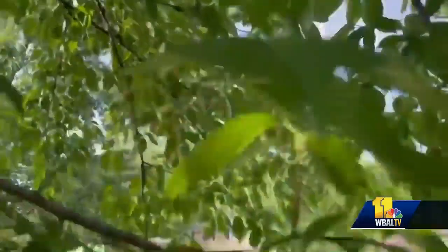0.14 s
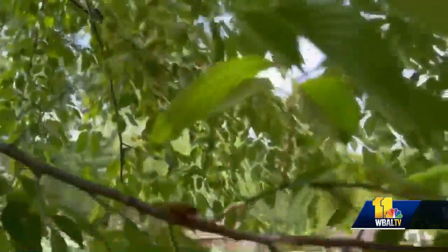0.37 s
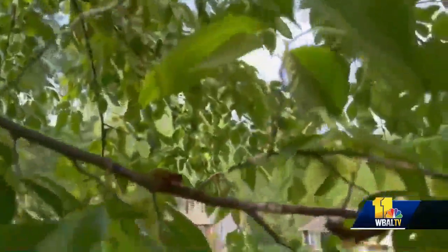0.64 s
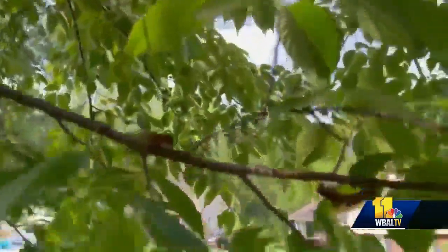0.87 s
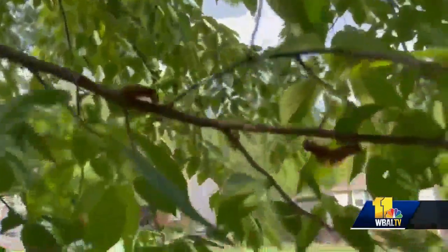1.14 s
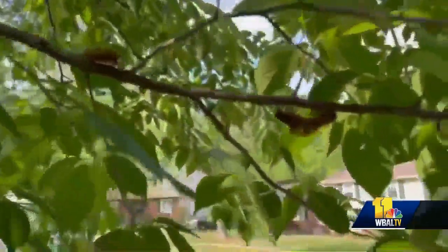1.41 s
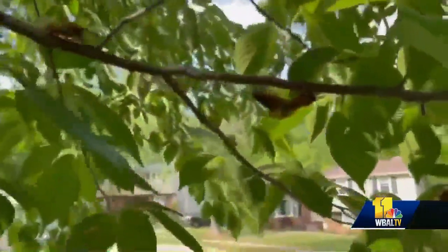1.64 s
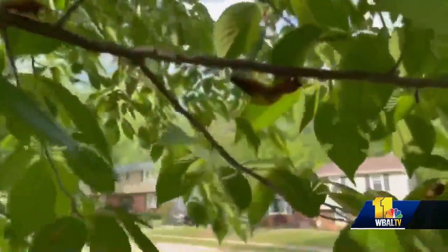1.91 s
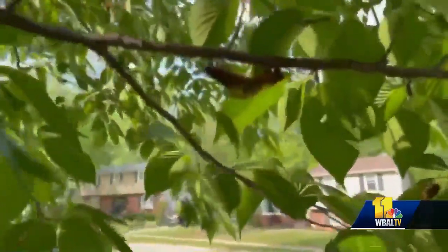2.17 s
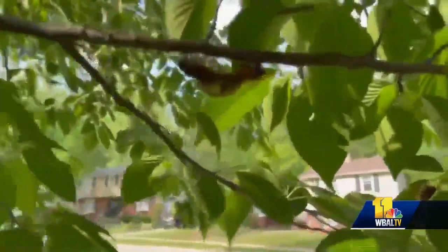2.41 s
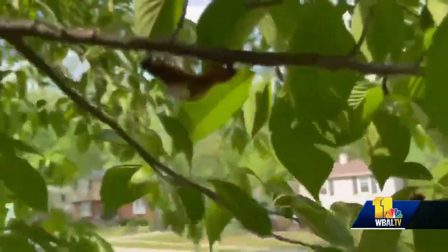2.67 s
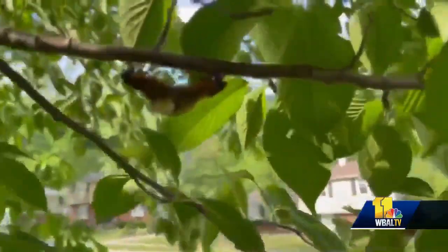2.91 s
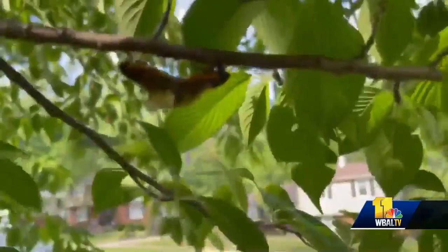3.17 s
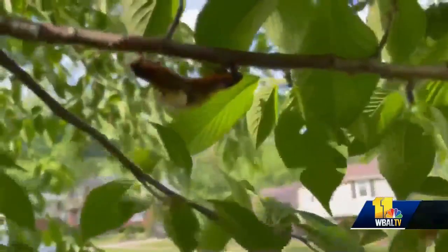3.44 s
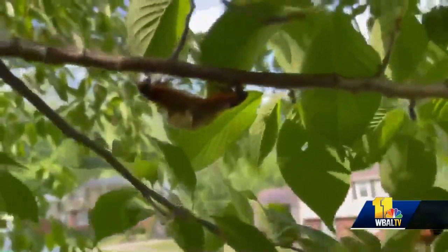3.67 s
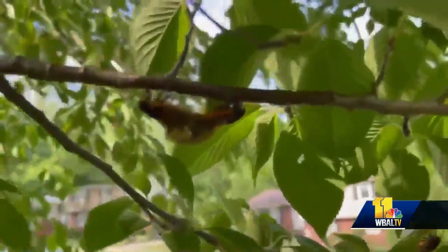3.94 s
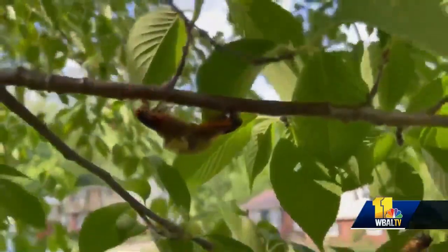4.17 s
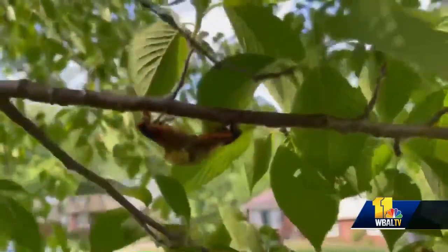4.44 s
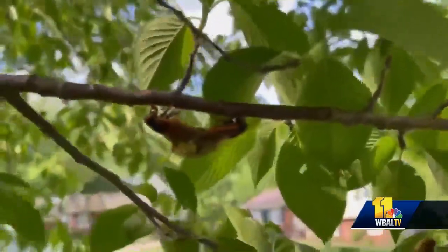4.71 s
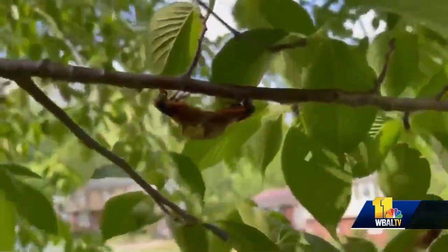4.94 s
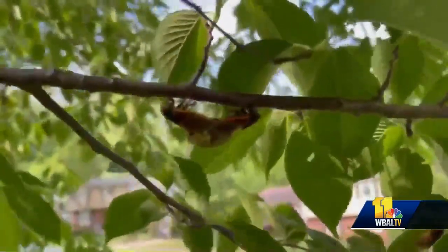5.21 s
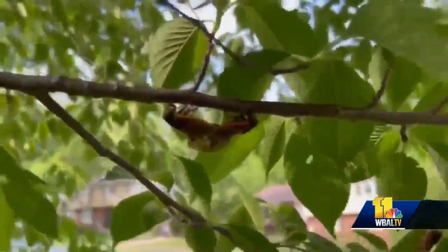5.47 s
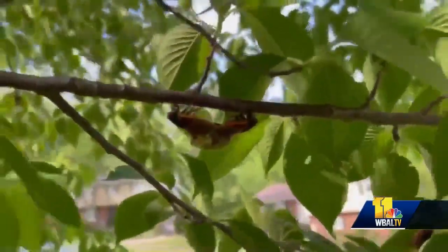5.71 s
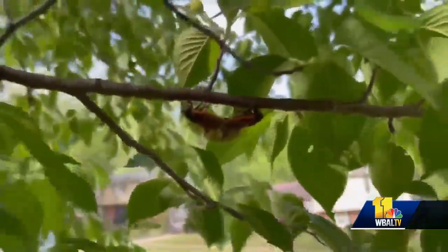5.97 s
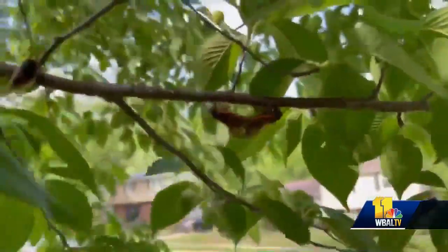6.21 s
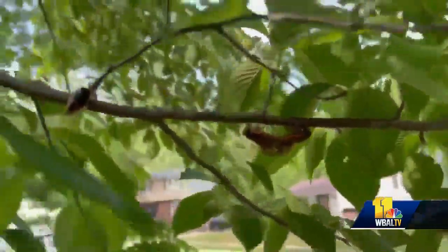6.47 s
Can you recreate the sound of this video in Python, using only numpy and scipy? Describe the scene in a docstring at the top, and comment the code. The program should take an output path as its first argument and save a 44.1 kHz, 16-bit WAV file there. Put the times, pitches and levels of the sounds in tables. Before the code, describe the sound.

A dense chorus of cicadas buzzes high and raspy in a leafy tree, dropping, swelling again and easing over faint suburban rumble.

```python
"""A tree full of cicadas around a handheld phone with two microphone ports, over the hum of a suburb.
Many singers click their tymbals some 230 times a second; the clicks merge into a buzz near 6 kHz.
The chorus starts loud, drops, swells again and eases; single singers glide up in pitch through it.
From 2.8 s a far engine, a few sine orders of its firing rate, revs up and then wavers near 50 Hz."""
import sys
import numpy as np
from scipy import signal
from scipy.fft import rfft, irfft, next_fast_len
from scipy.io import wavfile
from scipy.ndimage import uniform_filter1d

SR = 44100
rng = np.random.default_rng(int(sys.argv[2]) if len(sys.argv) > 2 else 0)


def master(y):
    """Save y as 16-bit WAV."""
    cut = np.clip(np.atleast_2d(y).T, -1, 1)
    pcm = np.round(cut * 32767)  # scale
    wavfile.write(sys.argv[1], SR, pcm.astype(np.int16))


def volts_from_decibels(level):
    """Turn decibel levels (scalar or array-like) into linear amplitude factors."""
    exponent = np.asarray(level, float) / 20
    return 10 ** exponent


N = 291060
SIZE = next_fast_len(N)
HZ = np.maximum(np.fft.rfftfreq(SIZE, 1 / SR), 1)
TIME = np.arange(N) / SR

# stereo image of the sound, right channel against left over frequency:
# freq_hz, right_minus_left_db, likeness (0-1), phase_lead_rad
STEREO_IMAGE = [(60, -2.3, 0.72, -0.04), (300, -2.0, 0.73, -0.07), (500, -1.9, 0.23, 1.33),
                (900, -1.1, 0.39, 2.19), (1300, -1.4, 0.41, 2.92), (1700, -0.1, 0.8, 3.15),
                (2300, -0.1, 0.35, 6.12), (3000, -0.6, 0.38, 3.16), (3600, -1.6, 0.16, 1.57),
                (4300, -2.8, 0.35, -0.26), (5000, -6.3, 0.12, -1.88), (5800, -8.1, 0.12, -3.3),
                (6600, -6.1, 0.14, -0.26), (7200, -1.8, 0.13, -2.5), (7900, -1.1, 0.51, -0.25),
                (8500, -1.1, 0.44, -0.01), (8900, -0.2, 0.75, 0.11), (9400, 0.3, 0.38, 1.91),
                (10100, -0.0, 0.93, 3.14), (11000, -0.0, 0.63, 4.32), (11500, -0.2, 0.54, 5.62),
                (12000, -0.6, 0.19, 6.21)]


def over_hz(table):
    """Columns of a (Hz, ..) table at every frequency, interpolated over log Hz."""
    hz, *columns = np.transpose(table)
    return [np.interp(np.log(HZ), np.log(hz), c) for c in columns]


def over_time(table):
    """Columns of a (s, ..) table at every sample."""
    s, *columns = np.transpose(table)
    return [np.interp(TIME, s, c) for c in columns]


def walk(rate_hz):
    """Random levels, rate_hz a second, slewed from one to the next; spread near 1."""
    hold = int(SR / rate_hz)
    steps = np.repeat(rng.standard_normal(N // hold + 1), hold)
    return uniform_filter1d(steps, hold)[:N] * 1.12


def stereo(near, other):
    """Left and right spectra: the right shares part of the left sound, phase-shifted; the rest is other sound."""
    right_db, like, lead_rad = over_hz(STEREO_IMAGE)
    like = np.clip(like, 0, 1)
    left = rfft(near, SIZE)
    shared = like * np.exp(1j * lead_rad) * left
    right = shared + np.sqrt(1 - like ** 2) * rfft(other, SIZE)
    return np.array([left, volts_from_decibels(right_db) * right])


def split_bands(spectra, edges_hz, blend_hz):
    """Neighbouring bands as sounds, crossfaded at the edges; together they make the whole."""
    above = [1] + [np.clip((HZ - e) / blend_hz + .5, 0, 1) for e in edges_hz] + [0]
    return [irfft(spectra * (lo - hi), SIZE)[:, :N] for lo, hi in zip(above, above[1:])]


def parts(spectra, edges_hz, blend_hz):
    """Bands of the spectrum, each at rms 1 in the mean of left and right."""
    return [s / s.mean(axis=0).std() for s in split_bands(spectra, edges_hz, blend_hz)]


def patchy(sound, edges_hz, drift_db=1.1, flicker_db=1.8):
    """Narrow strands of the sound swell and flicker each by itself."""
    strands = split_bands(rfft(sound, SIZE), edges_hz, 200)
    return sum(volts_from_decibels(drift_db * walk(2.91) + flicker_db * walk(16)) * strand for strand in strands)


def tymbal(rate_hz, jitter=.06, scatter_db=2, throb_db=3):
    """Nearly even clicks of uneven strength, throbbing in level."""
    interval_chance, level_chance = rng.standard_normal((2500, 2)).T
    at = np.cumsum(SR / rate_hz * (1 + jitter * interval_chance)).astype(int)
    clicks = np.zeros(N)
    clicks[at[at < N]] = volts_from_decibels(scatter_db * level_chance[at < N])
    return clicks * volts_from_decibels(throb_db * walk(22))


def ring(x, hz, width_hz):
    """One resonance: a pole pair whose radius sets the bandwidth, with zeros at 0 Hz and SR / 2."""
    r = np.exp(-np.pi * width_hz / SR)
    poles = [1, -2 * r * np.cos(2 * np.pi * hz / SR), r ** 2]
    return (1 - r) * signal.lfilter([1, 0, -1], poles, x)


def singer(rate_hz=232, rate_spread=.08, phrase_db=2.5, tune_hz=5850, tune_spread=0.057, width_hz=1500,
           upper_ratio=1.418, upper_db=-2, upper_width_hz=600):
    """One cicada of the crowd: phrases of clicks ring its drum and a higher, narrower mode."""
    rate_chance, tune_chance = rng.standard_normal(2)
    clicks = tymbal(rate_hz * (1 + rate_spread * rate_chance)) * volts_from_decibels(phrase_db * walk(2.505))
    hz = tune_hz * (1 + tune_spread * tune_chance)
    drum = ring(clicks, hz, width_hz)
    return drum + volts_from_decibels(upper_db) * ring(clicks, upper_ratio * hz, upper_width_hz)


def crowd(singers=20, far_db=5.5):
    """Near singers summed over the smooth wash of countless far ones, as white noise."""
    near = sum(singer() for _ in range(singers))
    return near / near.std() + volts_from_decibels(far_db) * rng.standard_normal(N)


def cicadas(mean_swell_db=-28, flicker_db=0.4, balance_db=1.36):
    """The chorus in bands: all follow one swell, near singers brighten it, the treble flickers by itself."""
    # swell of the chorus: time_s, level_db, near_treble_db (more while singers are near),
    # left_minus_right_db (as the phone turns; used about its mean)
    chorus = [(0.0, -22.5, -13, 9.3), (0.33, -25, -13.5, 7.9), (0.81, -25, -12, 6.7),
              (0.97, -26.5, -13.5, 7), (1.43, -34.5, -12.5, 7.0), (1.69, -32, -16, 7.1),
              (2.02, -32, -12, 4), (2.83, -30, -12.5, 8.0), (3.29, -30, -12, 8.7), (3.82, -28.5, -12, 7.8),
              (4.19, -27.5, -14, 9.0), (4.65, -25.5, -10.5, 5.0), (4.74, -23, -11, 6),
              (5.6, -24.5, -14, 6.5), (6.17, -26, -15, 8.8), (6.3, -28, -14.5, 5.4),
              (6.47, -28.5, -12, 7.7), (6.6, -29, -13, 8.7)]
    # spectral shape of the buzz on the left, relative within each part: freq_hz, gain_db
    body = [(2500, -35.5), (3100, -25.5), (3800, -18), (4600, -15.5), (5000, -6.5), (5400, -4.5),
            (5600, -1), (5900, -1), (6500, -3.5), (6850, -10.5), (7100, -20.5), (7500, -19.5),
            (8100, -20.5), (8800, -24), (9400, -25), (10200, -22.5), (11300, -17), (11700, -25),
            (12300, -30), (13000, -49.5)]
    # low shoulder, deeper singers, shriller singers, upper rasp, overtone:
    # level_db (over the mean swell), swell_share, near_treble_share
    part_mix = [(-11, 0.88, 0.13), (-1.5, 1.04, 0.012), (-5.5, 1.01, 0.078), (-1.5, 1.02, 1.04),
                (-4.5, 0.98, 1.08)]
    # borders between those parts: freq_hz
    part_edges_hz = [4700, 6050, 7000, 9700]
    # borders between the strands of the main buzz: freq_hz
    buzz_edges_hz = [5000, 5300, 5600, 5900, 6200, 6500, 6800]
    # borders between the strands of the treble: freq_hz
    strand_edges_hz = [7600, 8300, 9000, 9700, 10500, 11200, 11900]

    level_db, near_db, pan_db = over_time(chorus)
    spectra = volts_from_decibels(over_hz(body)[0]) * (HZ > 2300) * stereo(crowd(), crowd())
    levelled = []
    for (db, swell, near), part in zip(part_mix, parts(spectra, part_edges_hz, 200)):
        part_db = mean_swell_db + db + swell * (level_db - mean_swell_db) + near * near_db
        levelled.append(volts_from_decibels(part_db) * part)
    shoulder, deep, shrill, rasp, overtone = levelled

    shrill = volts_from_decibels(balance_db * walk(6)) * shrill  # the shriller singers come and go
    # the phone turns, so the loudest part of the buzz leans from side to side
    lean = volts_from_decibels(np.array([[.5], [-.5]]) * (pan_db - pan_db.mean()))
    buzz = lean * patchy(deep + shrill, buzz_edges_hz, drift_db=0.58, flicker_db=1.4)
    treble = volts_from_decibels(flicker_db * walk(14)) * patchy(rasp + overtone, strand_edges_hz)
    return shoulder + buzz + treble


def suburb(rumble_db=5, murmur_db=0.3, hiss_db=0, gust_db=1.5, hiss_waver_db=1.3, wind_db=-10.5):
    """Shaped noise as traffic rumble, murmur and far hiss; wind stirs each port alone."""
    # noise spectrum, relative within each layer: freq_hz, density_db (per Hz)
    spectrum = [(12, -58), (20, -36), (36, -13), (59, 2), (115, -8.5), (136, -10.5), (163, -13),
                (260, -24.5), (433, -20), (499, -21), (1270, -14), (1660, -19), (2600, -25.5), (3380, -78),
                (5720, -120)]
    # how busy the roads are; the layers are set against it: time_s, level_db
    traffic = [(0.1, -61.5), (1.61, -63), (1.82, -60), (2.33, -61), (4.73, -57.5), (6.08, -59.5),
               (6.12, -60.5), (6.19, -58.5), (6.55, -61)]

    shape = volts_from_decibels(over_hz(spectrum)[0])
    air = shape * stereo(rng.standard_normal(N), rng.standard_normal(N))
    rumble, murmur, hiss = parts(air, [220, 1050], 60)
    wind = irfft((HZ < 200) * shape * rfft(rng.standard_normal((2, N)), SIZE), SIZE)[:, :N]
    low = volts_from_decibels(rumble_db + gust_db * walk(3.97)) * (rumble + volts_from_decibels(wind_db) * wind / wind.std())
    high = volts_from_decibels(hiss_db + hiss_waver_db * walk(5)) * hiss
    return volts_from_decibels(over_time(traffic)[0]) * (low + volts_from_decibels(murmur_db) * murmur + high)


def solos(width_hz=480, edge_s=0.025, rate_hz=228, rate_spread=.06, nearer_left_db=3.5, glide=0.013):
    """Single singers whose drum glides up in pitch by the share glide, with separate clicks left and right."""
    # singers that stand out of the crowd and break off: start_s, end_s, pitch_hz, end_db, swell_db
    phrases = [(0.398, 1.06, 9400, -47, -3), (2.08, 2.5, 6340, -29.5, 8.5), (1.8, 2.02, 6250, -37.5, 0),
               (0.95, 1.3, 4500, -41, -2), (1.76, 2.46, 8400, -47, 3), (2.6, 2.76, 5000, -36.5, 2),
               (3.87, 4.1, 6500, -31.5, 6), (4.17, 5.299, 8130, -45, 3), (4.6, 5.7, 5880, -28.5, 10),
               (6, 6.8, 6150, -31, 4)]

    out = 0
    r = np.exp(-np.pi * width_hz / SR)
    for start, end, hz, end_db, swell_db in phrases:
        own_hz = rate_hz * (1 + rate_spread * rng.standard_normal())
        clicks = np.array([tymbal(own_hz, jitter=.012, throb_db=2.0) for _ in range(2)])
        # a moving resonance: shift its pitch to zero, smooth twice, shift back
        pitch_hz = hz * (1 + glide * np.interp(TIME, [start, end], [-.5, .5]))
        turn = np.exp(2j * np.pi * np.cumsum(pitch_hz) / SR)
        both = (turn * signal.lfilter([1], [1, -2 * r, r ** 2], clicks / turn)).real
        gate = np.clip(np.minimum(TIME - start, end - TIME) / edge_s, 0, 1)
        swell = volts_from_decibels(np.interp(TIME, [start, end], [end_db - swell_db, end_db]))
        pan_db = nearer_left_db - np.interp(hz, HZ, over_hz(STEREO_IMAGE)[0])
        pan = volts_from_decibels(np.array([[.5], [-.5]]) * pan_db)
        out = out + gate * swell * pan * both / both.std()
    return out


def engine(waver_db=2.5, right_db=-2, ease_s=.15, rev_db_per_hz_s=0.37):
    """Low orders of the firing rate as sines, each wavering on its way through the air."""
    # speed and load: time_s, firing_hz, load_db
    run = [(2.8, 39.5, -77), (3.0, 41.3, -58), (3.13, 46, -59), (3.3, 51.13, -60.5), (4.08, 54.2, -57),
           (4.34, 49.4, -59), (4.91, 50.44, -58), (5.15, 53.94, -67), (5.55, 55, -59), (6.2, 48, -61),
           (6.6, 51, -56)]
    # levels of orders 1, 2, 3, 5 against the load: level_db
    order_db = [0.5, 1, -8, -13]
    # the fifth order sounds while the engine pulls: start_s, end_s
    pull_s = (3.15, 4.23)

    hz, load_db = over_time(run)
    phase = 2 * np.pi * np.cumsum(hz) / SR
    climb_hz_s = uniform_filter1d(np.gradient(hz) * SR, int(ease_s * SR))
    bark = volts_from_decibels(rev_db_per_hz_s * climb_hz_s)  # the third order barks while the speed climbs
    pull = np.clip(np.minimum(TIME - pull_s[0], pull_s[1] - TIME) / ease_s, 0, 1)
    tone = 0
    for order, share, db in zip([1, 2, 3, 5], [1, 1, bark, pull], order_db):
        level = share * volts_from_decibels(db + waver_db * walk(8))
        tone = tone + level * np.sin(order * phase + order * order)
    fade_in = np.clip((TIME - run[0][0]) / ease_s, 0, 1)
    return np.sqrt(2) * fade_in * volts_from_decibels(load_db) * tone * volts_from_decibels(np.array([[0], [right_db]]))


def scene():
    """Cicadas and solo singers over suburb and engine."""
    return cicadas() + solos() + suburb() + engine()


def band_limit(x):
    """A steep low-pass at the top of the band."""
    return signal.sosfilt(signal.butter(12, 13390, fs=SR, output="sos"), x)


def record(dry):
    """The finished mix as it is heard."""
    return band_limit(dry)


dry = scene()
out = record(dry)
master(out)
```